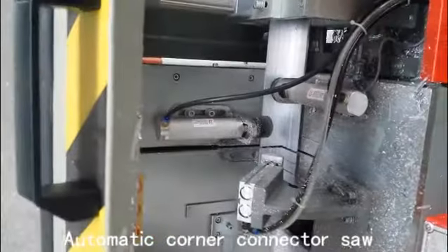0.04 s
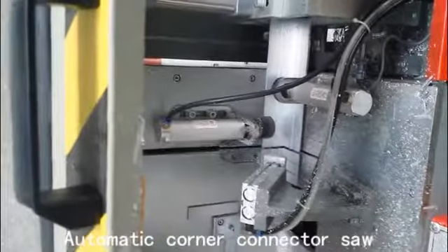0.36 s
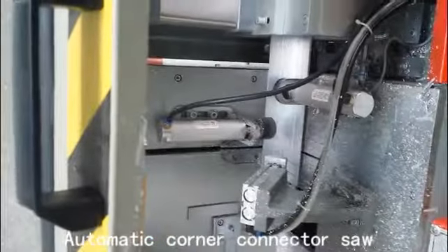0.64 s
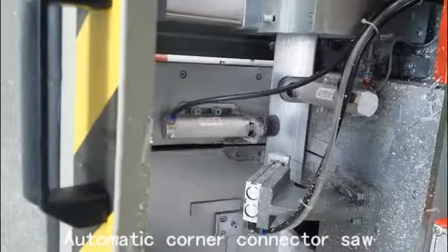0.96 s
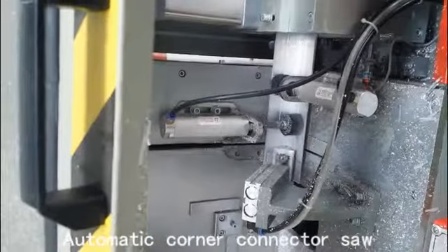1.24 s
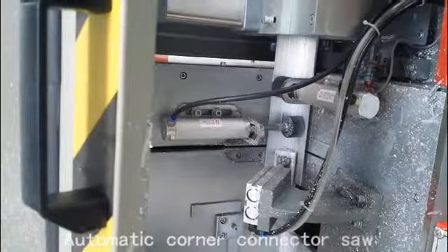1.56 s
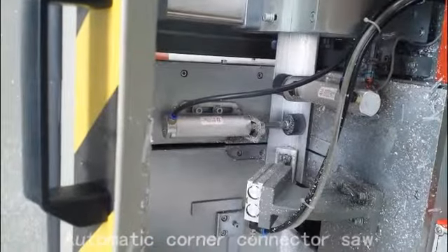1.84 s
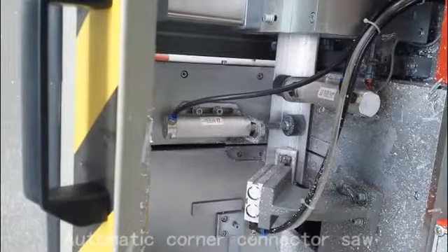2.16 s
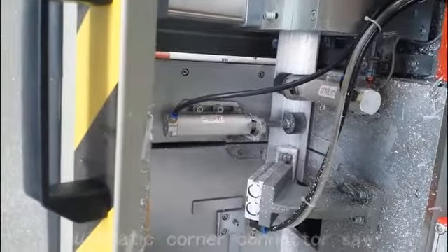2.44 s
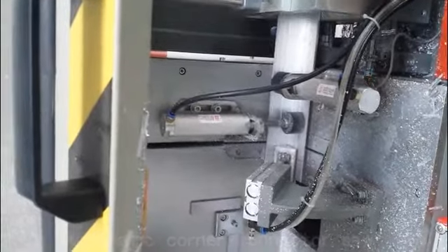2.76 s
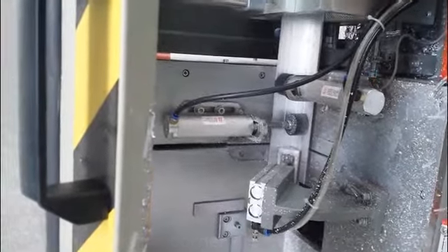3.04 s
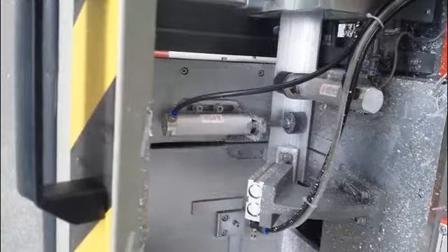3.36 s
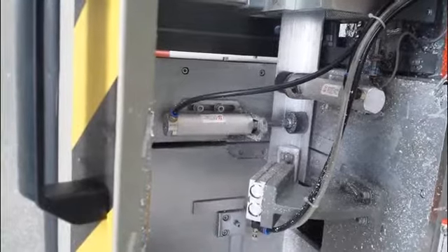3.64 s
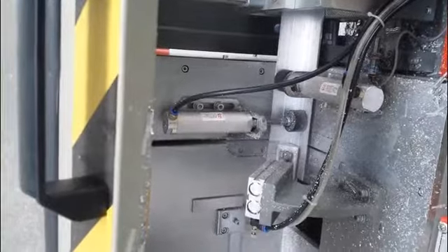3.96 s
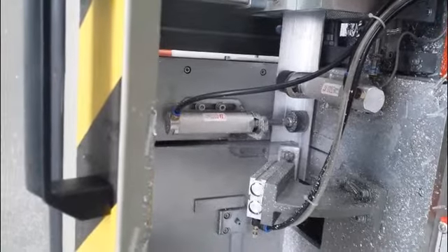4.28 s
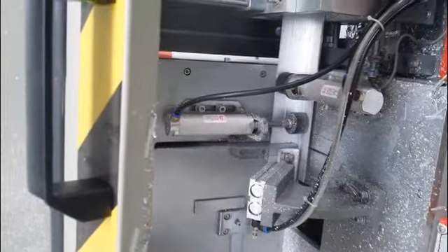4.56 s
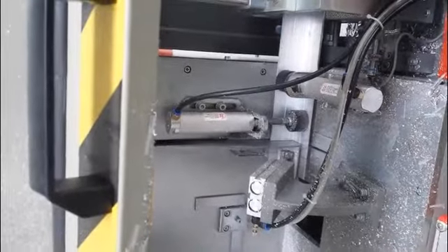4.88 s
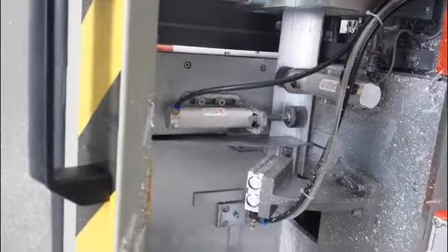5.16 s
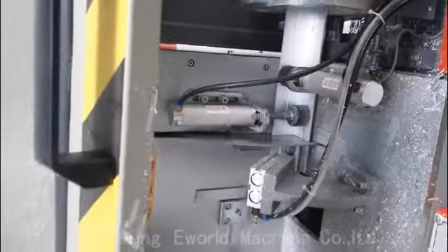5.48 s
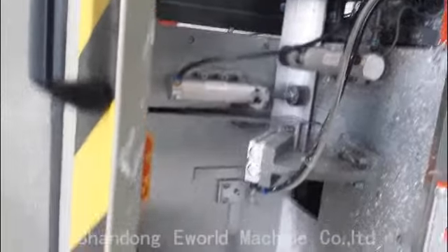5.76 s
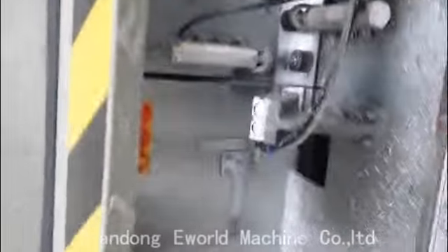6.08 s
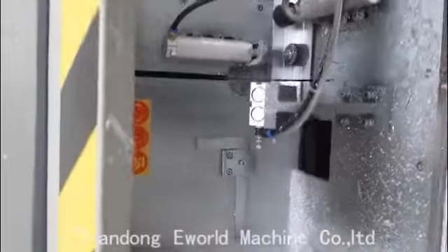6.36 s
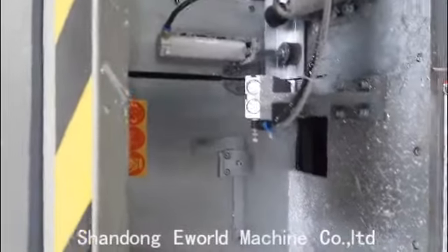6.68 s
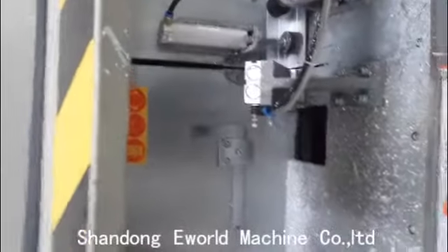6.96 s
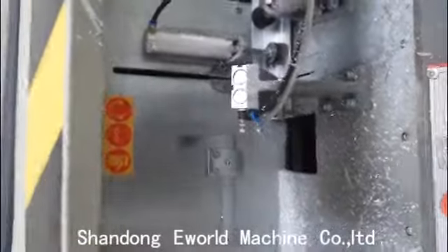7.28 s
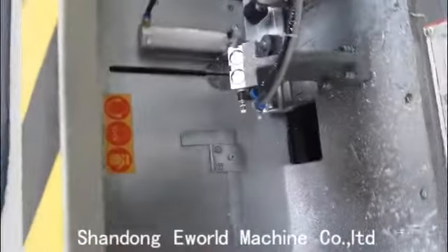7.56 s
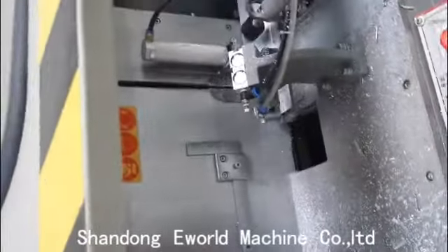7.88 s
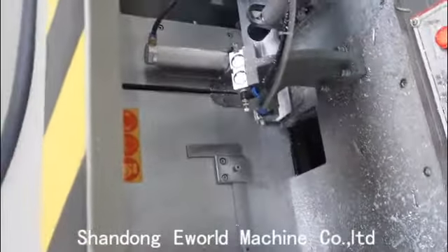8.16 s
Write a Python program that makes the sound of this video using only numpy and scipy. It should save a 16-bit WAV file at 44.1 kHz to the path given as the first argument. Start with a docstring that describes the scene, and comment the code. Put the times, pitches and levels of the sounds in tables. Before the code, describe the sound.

A saw's motor hums and drones close by throughout, with airy rushing from the spinning blade. A knock and a puff of air open, followed by a clack at 0.6 seconds. Around 0.9 a metal profile slides with a short groan, and at 1.1 air clamps shut with a loud double bang, echoing briefly in the workshop. Air puffs at 1.6, and from 2.1 a bright mist hiss swells. At 3.7 the blade bites into aluminium: a loud, very high whine with squeals, rasping chatter and spraying chips, sagging slightly in pitch. The cut ends near 5.3 and the pitch climbs back as air vents until 6.5. The retracting blade rings on, squealing strongly at 6 and grazing the metal at 6.4. Clamps release with a clatter at 6.9. A burst of air and two dull knocks come around 8, over the idling machine.

```python
"""Automatic saw cutting aluminium.

The profile slides forward, groaning as it sticks and slips, and air clamps bang shut. Coolant mist
hisses and the spinning blade comes out of its slot, stirring the air. Its teeth whine, chatter and tear
off chips as it slows in the metal; it rings on as it draws back, cylinders vent and the clamps let go.
The machine hums and drones underneath, and the blows echo in the workshop."""
import sys
import numpy as np
from scipy import signal
from scipy.io import wavfile
from scipy.ndimage import uniform_filter1d

SR = 44100
rng = np.random.default_rng(int(sys.argv[2]) if len(sys.argv) > 2 else 0)


def persist_wave(psi):
    """Save psi, clipped to +-1, as 16-bit WAV."""
    counts = np.round(np.clip(psi, -1, 1) * 32767).astype(np.int16)
    wavfile.write(sys.argv[1], SR, np.atleast_2d(counts).T)


N = 371322
ADVANCE_S, CUT_START_S, CUT_END_S, CLEAR_S = 1.96, 3.68, 5.26, 6.52  # blade stroke
TEETH = 108
TONE_DB, OCTAVE_DB, RUB_TONE_DB, RUB_OCTAVE_DB = -12, -15, -27, -33  # at full load; rubbing only


def whine(turns, tooth_hz, load):
    """Teeth strike harder with load; run-out throbs once a turn; fast glides beat with their echoes."""
    biting = np.clip(2 * load, 0, 1)
    rubbing = gate(CUT_START_S - .08, CLEAR_S, attack_s=.07, fall_db_per_s=150) * from_db(2.9 * drift(6))
    glide_hz_per_s = np.gradient(uniform_filter1d(tooth_hz, SR // 20)) * SR
    echo_share = .07 + .12 * biting + .5 * np.clip(np.abs(glide_hz_per_s) / 1300, 0, 1)
    shaft_rad = 2 * np.pi * turns
    phase = TEETH * shaft_rad + .09 * biting * drift(90)
    throb = 1 + biting * (.15 * np.sin(shaft_rad) + .08 * np.sin(2 * shaft_rad) + .1 * drift(60))
    tone_gain = np.hypot(from_db(TONE_DB) * load, from_db(RUB_TONE_DB) * rubbing) * pan(-.5)
    octave_gain = np.hypot(from_db(OCTAVE_DB) * np.sqrt(load), from_db(RUB_OCTAVE_DB) * rubbing) * pan(-16)
    tone = with_squeals(tone_gain, 1) * tooth_tone(phase, echo_share, flutter=.071)
    octave = with_squeals(octave_gain, 2) * tooth_tone(2 * phase, echo_share + .24, flutter=.11)
    third = biting * from_db(-30) * tooth_tone(3 * phase, echo_share + .2, flutter=.1)
    return throb * (tone + octave + third)


def tooth_tone(phase, echo_share, flutter):
    """One blade harmonic, out of step at the two ears; cabinet reflections beat against it."""
    sides = [np.exp(1j * (offset_rad + .45 * drift(1.5))) + echo_share * (drift(22) + 1j * drift(22))
             for offset_rad in (-.65, .65)]
    tone = np.real(np.array(sides) * (1 + flutter * drift(150)) * np.exp(1j * phase))
    return tone / np.sqrt(1 + 2 * echo_share ** 2)


# Blade squeals: middle t/s, half-power length/s, harmonic, peak level/dB, left-right/dB
SQUEALS = [(3.747, 0.041, 1, -8.5, 15), (3.835, .05, 1, -9, -8), (3.905, 0.082, 1, -8.5, 2),
           (4.027, 0.085, 1, -12, 8), (4.44, 0.22, 1, -17, -20), (4.71, 0.17, 1, -15, -17),
           (5.039, 0.093, 1, -9, 1.5), (5.351, 0.09, 1, -23, -14), (5.989, 0.13, 1, -6.5, 11),
           (6.231, 0.08, 1, -14, 5), (6.404, 0.11, 1, -15.5, -2), (3.74, 0.052, 2, -14, -17),
           (3.964, 0.035, 2, -3.5, -17), (4.637, .12, 2, -9, -12), (5.025, 0.1, 2, -11, -16)]


def with_squeals(steady_gain, order):
    """Stereo gain of one harmonic: the blade rings up and dies away in bell-shaped swells."""
    power = steady_gain ** 2
    for middle_s, length_s, harmonic, db, lean_db in SQUEALS:
        if harmonic == order:
            swell = .5 ** np.minimum((2 * (seconds() - middle_s) / length_s) ** 2, 60)
            power = power + (from_db(db) * pan(lean_db)) ** 2 * swell
    return np.sqrt(power)


# Tooth-passing rate in the cut: t/s, f/Hz
TOOTH_RATE = [(3.68, 5053), (3.774, 5020), (3.928, 4820), (3.996, 4690), (4.098, 4640), (4.486, 4813),
              (4.628, 4788), (4.878, 4865), (4.972, 4842), (5.1, 4880)]
IDLE_HZ, RUN_UP_S = 5054, .23
FULL_SAG_HZ, INERTIA_S = 503, .11


def blade_speed():
    """Tooth rate in Hz: dragged down in the cut, then running back up to idle."""
    cutting_hz = in_time(TOOTH_RATE)
    return IDLE_HZ + (cutting_hz - IDLE_HZ) * settling(TOOTH_RATE[-1][0], RUN_UP_S)


def blade_load(tooth_hz):
    """Cutting force, 1 at full load: it holds the speed down and brakes the blade's inertia."""
    sag_hz = uniform_filter1d(tooth_hz[0] - tooth_hz, SR // 12)
    braking_hz = INERTIA_S * np.gradient(sag_hz) * SR
    cutting = gate(CUT_START_S, CUT_END_S, attack_s=.02, fall_db_per_s=157)
    return np.maximum(sag_hz + braking_hz, 0) / FULL_SAG_HZ * cutting


# Teeth catching an edge: start/s, end/s, shaft order, level/dB, spread/orders
RASPS = [(3.676, 3.924, 28, -31.5, .8), (3.684, 3.818, 82, -18.5, 2.8), (3.824, 3.935, 81, -18, 3),
         (3.866, 4.063, 88, -21, 12), (3.905, 4.003, 54, -18, .9), (5.8, 6.55, 162, -31, .5)]
# Passes through the profile's two walls: start/s, end/s, level/dB
WALLS = [(4.003, 4.469, -5), (4.661, 5.161, -2.5)]
# Chatter in each wall: shaft order, relative level/dB, spread/orders
WALL_CHATTER = [(17, -36.5, .8), (54, -21, .4), (133.6, -19, 2.2), (243, -33, 4)]


def chatter(turns):
    """Uneven teeth repeat every turn, so chatter is a cluster of wavering shaft orders."""
    out = np.zeros((2, N))
    in_walls = [(start_s, end_s, centre, wall_db + db, width)
                for start_s, end_s, wall_db in WALLS for centre, db, width in WALL_CHATTER]
    for start_s, end_s, centre, db, width in RASPS + in_walls:
        span = slice(int(start_s * SR), int(end_s * SR))
        reach = np.ceil(2 * width)
        offsets = np.arange(-reach, reach + 1)[:, None]
        weights = np.exp(-(offsets / width) ** 2 / 2)
        lines = weights * np.exp(2j * np.pi * (round(centre) + offsets) * turns[span])
        swell = np.sin(np.linspace(0, np.pi, lines.shape[1], endpoint=False))
        for side in range(2):
            wander_rad = np.cumsum(rng.standard_normal(lines.shape), axis=1) * np.sqrt(25 / SR)
            wander_rad += 2 * np.pi * rng.random(offsets.shape)
            cluster = rms_one(np.real(lines * np.exp(1j * wander_rad)).sum(axis=0))
            out[side, span] += from_db(db) * cluster * swell
    return out


# Chip spectrum: f/Hz, relative level/dB
CHIP_SPECTRUM = [(700, -18), (1500, -2), (3000, 0.5), (6000, 5), (8500, 0.5), (11000, -6), (14500, -39)]
CHIPS_DB, GRAZE_DB, GRAZE_START_S, GRAZE_END_S = -15.5, -21, 6.31, 6.46


def chips(turns, load):
    """Chips tear off with load, in spurts once a turn and at random; the returning blade grazes the cut."""
    graze = gate(GRAZE_START_S, GRAZE_END_S, attack_s=.084, fall_db_per_s=300)
    strength = from_db(CHIPS_DB) * load + from_db(GRAZE_DB) * graze
    spurts_db = .41 * np.sin(2 * np.pi * turns) + drift(25)
    return strength * from_db(spurts_db) * noise(CHIP_SPECTRUM, flicker_db=3.5)


# Clamp, stop and cylinder blows: t/s, contact level/dB, low f/Hz, high f/Hz, t60/s, thud level/dB
BLOWS = [(.047, -13, 332, 1140, 0.096, -8), (.623, -18.5, 597, 3970, 0.28, -27),
         (.652, -23, 70, 170, 0.59, -40), (1.031, -18.5, 300, 4000, 0.67, -44),
         (1.048, -17, 2510, 10800, 0.46, -40), (1.125, -4, 1300, 9300, 0.22, -19),
         (1.147, -5.5, 1100, 5600, 0.11, -27), (1.279, -20.5, 7700, 9500, 0.058, -45),
         (1.306, -21.5, 250, 900, 0.12, -16.5), (2.0, -29.5, 300, 1210, 0.2, -37),
         (6.894, -14.5, 900, 3497, .059, -35), (6.902, -12.5, 603, 2600, 0.22, -33),
         (6.95, -22, 300, 1500, 0.19, -27), (7.955, -18.5, 291.5, 540, 0.59, -36),
         (8.079, -26.5, 250, 546, .39, -20.5)]
# Machine frame modes: f/Hz, relative level/dB, t60/s
FRAME_MODES = [(583, -12, 0.29), (1142, -6, 0.19), (1466, -13.5, 0.41), (1600, -25, .35),
               (1714, 6.5, 0.093), (2038, 2, 0.15), (2410, -3, 0.3), (3207, 2, 0.11), (3180, -30, 0.36),
               (3510, -31, 0.36), (4500, -24, .15)]
THUD_BAND_HZ, THUD_T60_S = (153, 270), .11


def blows():
    """Blows shake dense panel modes and the frame; the contact sets the band, and the cabinet thuds."""
    out, t = np.zeros((2, N + SR)), seconds(SR)
    crack = 1 + .48 * np.exp(-t / .0055)
    for start_s, db, low_hz, high_hz, t60_s, thud_db in BLOWS:
        panels = rng.standard_normal((2, SR))
        frame = sum(from_db(mode_db - 60 * t / ring_s) * np.sin(2 * np.pi * (hz * t + rng.random((2, 1))))
                    for hz, mode_db, ring_s in FRAME_MODES)
        hit = band(panels * crack * decay(t60_s) + .12 * frame, low_hz, high_hz)
        hit /= np.std(band(panels, low_hz, high_hz))
        thud = band(panels * decay(THUD_T60_S), *THUD_BAND_HZ) / np.std(band(panels, *THUD_BAND_HZ))
        start = round(start_s * SR)
        out[:, start:start + SR] += from_db(db) * spread(hit, np.sqrt(low_hz * high_hz))
        out[:, start:start + SR] += from_db(thud_db) * spread(thud, THUD_BAND_HZ[0])
    return out[:, :N]


def guard_ring(x):
    """The sheet-metal guard rings on after a blow, in a narrow band of dense modes."""
    return noise_tail(x, decay(t60_s=.17), low_hz=2720, high_hz=3240)


# Resonances of the hollow profile: f/Hz, width/Hz, relative level/dB
PROFILE_MODES = [(366, 230, 0), (606, 26, 0), (900, 26, 4.5), (1010, 20, -17), (1430, 25, -19),
                 (1586, 12, 3), (1710, 12, 0), (1870, 19, -6)]
FEED_START_S, FEED_STOP_S, SETTLE_S = .88, 1.097, .083
BREAKAWAY_DB, SLIDING_DB, SLIPS_PER_S = -9, -23.5, 2500


def slide():
    """The profile breaks loose, then sticks and slips over the table, groaning in its own resonances."""
    level_db = SLIDING_DB + (BREAKAWAY_DB - SLIDING_DB) * settling(FEED_START_S + .022, SETTLE_S)
    moving = gate(FEED_START_S, FEED_STOP_S, attack_s=.036, fall_db_per_s=700)
    slips = (rng.random(N) < SLIPS_PER_S / SR) * rng.standard_normal((2, N))
    groan = rms_one(sum(from_db(db) * stereo_band(slips, hz, width) for hz, width, db in PROFILE_MODES))
    scrape = rms_one(band(slips, low_hz=250, high_hz=1300))
    return moving * from_db(level_db) * rms_one(groan + .46 * scrape)


# Cylinder vents: start/s, end/s, level/dB, fall/(dB/s)
VENTS = [(.14, 0.297, -24, 37), (1.61, 1.665, -24.5, 28), (5.145, 6.483, -23.5, 114),
         (6.844, 6.889, -26.5, 38), (7.825, 7.869, -19, 41)]
# Exhaust spectrum: f/Hz, relative level/dB
EXHAUST_SPECTRUM = [(600, -31), (1500, -6), (3500, -1), (7000, -0.5), (9500, -2.5), (12000, -6),
                    (14500, -22)]
HISS_ATTACK_S, LEAK_DB = .035, -41


def cylinder_air():
    """Cylinders vent while they move, over a small steady leak."""
    vent_power = sum((from_db(db) * gate(start_s, end_s, HISS_ATTACK_S, fall)) ** 2
                     for start_s, end_s, db, fall in VENTS)
    strength = np.sqrt(from_db(LEAK_DB) ** 2 + vent_power)
    return strength * noise(EXHAUST_SPECTRUM, flicker_db=2) * pan(1)


# Swells of the mist hiss: start/s, end/s, full level/dB
MIST_SWELLS = [(2.105, 3.68, -17.5), (4.23, 5.096, -18)]
# Mist spectrum: f/Hz, relative level/dB
MIST_SPECTRUM = [(600, -40), (1500, -15), (3500, -5), (6000, -1), (8500, 3), (11000, -2.5), (14500, -7)]
SWELL_FROM_DB, SWELL_TAU_S = -6.5, .32


def coolant_mist():
    """Bright mist hiss that swells, sinks under the heaviest cutting and swells back."""
    strength = 0
    for start_s, end_s, db in MIST_SWELLS:
        audible = gate(start_s, end_s, HISS_ATTACK_S, fall_db_per_s=55)
        strength += audible * from_db(db + SWELL_FROM_DB * settling(start_s, SWELL_TAU_S))
    return strength * noise(MIST_SPECTRUM, flicker_db=1) * pan(1.5)


# Air stirred by the blade: t/s, level/dB
WINDAGE_LEVEL = [(0, -24), (1.0, -22.5), (1.3, -26), (1.9, -30), (2.45, -23.5), (2.95, -20.5),
                 (3.66, -20.5), (3.72, -28), (4.0, -36), (4.5, -33), (4.9, -31.5), (5.35, -22.5),
                 (5.75, -23.5), (5.92, -27.5), (6.9, -28), (7.7, -27.5), (8.0, -22.5), (8.42, -20.5)]
# Windage spectrum: f/Hz, relative level/dB
WINDAGE_SPECTRUM = [(90, -39), (130, -8), (250, -9), (450, -11), (800, -10), (1300, -14.5), (1900, -9.5),
                    (2500, -5), (3400, -8.5), (5000, -11), (7500, -10.5), (10000, -17.5), (14000, -32.5)]
# Tooth gullets resonating in the guard: f/Hz, nominal width/Hz, relative level/dB
GULLETS = [(2265, 350, -2.5), (2495, 195, 1), (2684, 160, -10.5)]


def windage(level_db):
    """The spinning teeth stir the air, which sings hollowly in the guard."""
    hollow = 0
    for hz, width_hz, db in GULLETS:
        broad = resonate(rng.standard_normal((2, N)), hz, 2 * width_hz)
        hollow += from_db(db) * rms_one(resonate(broad, hz, 2 * width_hz))
    rush = from_db(2) * noise(WINDAGE_SPECTRUM, flicker_db=1.96)
    return from_db(level_db) * (rush + hollow * pan(7))


# Turbulence spectrum: f/Hz, relative level/dB
BUFFET_SPECTRUM = [(65, -7), (110, 2), (180, 4.5), (280, -1.5), (500, -5.5), (1000, -13), (2000, -44),
                   (5000, -60)]
BUFFET_SHARE_DB, APPROACH_DB, IN_CUT_DB = -15, -24, -38


def buffet(windage_db):
    """Low turbulence of the blade's draught swells as the gap to the profile closes; drops at contact."""
    draught = from_db(windage_db + BUFFET_SHARE_DB)
    approach = from_db(APPROACH_DB) * gate(ADVANCE_S, CUT_START_S, attack_s=.94, fall_db_per_s=300)
    in_cut = from_db(IN_CUT_DB) * gate(CUT_START_S, CUT_END_S, attack_s=.21, fall_db_per_s=7)
    return np.sqrt(draught ** 2 + approach ** 2 + in_cut ** 2) * noise(BUFFET_SPECTRUM, flicker_db=1)


# Motor hum: shaft order, level/dB
HUM_ORDERS = [(3, -42), (8, -49.5), (17, -55.5)]
# Hum envelope: t/s, gain/dB
HUM_GAIN = [(0, 6), (.8, 7), (1.6, -15), (2.3, 3), (3.6, 2), (3.9, -10), (4.9, -17), (5.3, 8.5), (6.0, -7),
            (6.8, -1.5), (7.2, 6), (8.42, 5)]


def motor(turns):
    """The motor hums at low orders of the shaft, wavering a little."""
    hum = sum(from_db(db + 2 * drift(2.8)) * np.sin(2 * np.pi * order * turns + .079 * drift(3.2))
              for order, db in HUM_ORDERS)
    return np.sqrt(2) * hum * from_db(in_time(HUM_GAIN)) * pan(2)


# Low machine drone, strongest as a hum near four times shaft speed: f/Hz, width/Hz, level/dB
DRONE_BANDS = [(100, 23, -50.5), (183.4, 16, -42), (440, 90, -47.5)]
# Hall rumble spectrum: f/Hz, relative level/dB
HALL_SPECTRUM = [(25, -5), (45, -2), (90, 10), (150, -1)]


def drone(turns, windage_db):
    """The machine drones in narrow noise bands over the shaft's unbalance and the hall's rumble."""
    bands = sum(from_db(db) * stereo_band(rng.standard_normal((2, N)), hz, width_hz)
                for hz, width_hz, db in DRONE_BANDS)
    unbalance = .5 * np.sin(2 * np.pi * turns)
    rumble_db = -43 + .74 * (windage_db + 24.5)  # follows part of the windage's swing
    return bands + from_db(rumble_db) * (unbalance + .64 * noise(HALL_SPECTRUM, flicker_db=1.5))


def bass_dip(x, edge_hz=92):
    """The deep bass drops away during the cut and creeps back afterwards."""
    share = gate(CUT_START_S, CUT_END_S, attack_s=.091, fall_db_per_s=29)
    thin = signal.sosfilt(signal.butter(4, edge_hz, "high", fs=SR, output="sos"), x)
    return (1 - share) * x + share * thin


def cabinet_echoes(x, count=6, echo_db=-15, delay_range_s=(.0015, .012)):
    """Close reflections, different at each ear, comb the hiss without changing its level."""
    out = x.copy()
    lags = (SR * rng.uniform(*delay_range_s, (2, count))).astype(int)
    for side in range(2):
        for k, lag in enumerate(lags[side]):
            out[side, lag:] += (-1) ** k * from_db(echo_db) * x[side, :-lag]
    return out / np.sqrt(1 + count * from_db(echo_db) ** 2)


def workshop(x):
    """The hall returns a diffuse, dull tail after 12 ms."""
    return noise_tail(x, decay(t60_s=.99) * (seconds(SR) > .012), low_hz=152, high_hz=5070)


# Stereo likeness: f/Hz, left-right correlation (capped at 1)
LIKENESS = [(40, 0.1), (120, 1.06), (300, 0.76), (600, 0.66), (1200, 0.1), (3000, 0.06), (10000, 0)]
# Stereo balance: f/Hz, left-right/dB
LEAN = [(100, 2.5), (1000, 2), (2500, 2), (5000, 2.5), (10000, -8.5)]


def spread(pair, hz):
    """Two unrelated signals become left and right: alike in the upper bass, unrelated in the treble."""
    alike = np.clip(at_hz(LIKENESS, hz), -1, 1)
    mid = np.sqrt((1 + alike) / 2) * pair[0]
    side = np.sqrt((1 - alike) / 2) * pair[1]
    return np.array([mid + side, mid - side]) * pan(at_hz(LEAN, hz))


def stereo_band(pair, hz, width_hz):
    """One narrow band in stereo; rms 1."""
    return rms_one(spread(band(pair, hz - width_hz / 2, hz + width_hz / 2), hz))


def noise(spectrum, flicker_db):
    """Bands of stereo noise, each flickering on its own; rms 1."""
    edges_hz = np.r_[np.geomspace(25, 4500, 15), np.linspace(6000, 15000, 6)]
    white = rng.standard_normal((2, 2, N))
    out = 0
    for k, (low_hz, high_hz) in enumerate(zip(edges_hz, edges_hz[1:])):
        hz = np.sqrt(low_hz * high_hz)
        if spectrum[0][0] / np.sqrt(2) < hz < spectrum[-1][0] * 2:
            gain = from_db(at_hz(spectrum, hz) + flicker_db * drift(7))
            out += gain * spread(band(white[k % 2], low_hz, high_hz), hz)
    return rms_one(out)


def noise_tail(x, envelope, low_hz, high_hz):
    """Convolves with one second of shaped band noise of unit energy."""
    tail = band(rng.standard_normal((2, SR)), low_hz, high_hz) * envelope
    return signal.fftconvolve(x, tail / np.sqrt(np.sum(tail ** 2) / 2), axes=1)[:, :N]


def drift(rate_hz):
    """Smooth random curve of spread 1."""
    hop, warm_up = 40, 2000
    pole = np.exp(-2 * np.pi * rate_hz * hop / SR)
    white = rng.standard_normal(N // hop + warm_up + 2)
    slow = signal.lfilter([1], [1, -2 * pole, pole ** 2], white)[warm_up:]
    return np.interp(np.arange(N) / hop, np.arange(len(slow)), rms_one(slow))


def band(x, low_hz, high_hz):
    edges_hz = np.clip([low_hz, max(high_hz, 1.1 * low_hz)], 10, .47 * SR)
    return signal.sosfilt(signal.butter(2, edges_hz, "band", fs=SR, output="sos"), x)


def resonate(x, hz, width_hz):
    """One resonance with peak gain 1."""
    r = np.exp(-np.pi * width_hz / SR)
    feedback = [1, -2 * r * np.cos(2 * np.pi * hz / SR), r * r]
    return signal.lfilter(np.array([1, 0, -1]) * (1 - r * r) / 2, feedback, x)


def gate(start_s, end_s, attack_s, fall_db_per_s):
    """Rises from the start, holds at 1, dies away after the end."""
    t = seconds()
    fall_db = np.minimum(fall_db_per_s * np.maximum(t - end_s, 0), 200)
    return np.clip((t - start_s) / attack_s, 0, 1) * from_db(-fall_db)


def settling(start_s, tau_s):
    """1 up to the start, then relaxing towards 0."""
    return np.exp(-np.maximum(seconds() - start_s, 0) / tau_s)


def decay(t60_s):
    return from_db(-60 * seconds(SR) / t60_s)


def pan(lean_db):
    """Constant-power gains; positive leans left."""
    gains = from_db(lean_db * np.array([[.5], [-.5]]))
    return gains / np.sqrt(np.mean(gains ** 2))


def in_time(table):
    return np.interp(seconds(), *np.transpose(table))


def at_hz(table, hz):
    points_hz, values = np.transpose(table)
    return np.interp(np.log(hz), np.log(points_hz), values)


def seconds(samples=N):
    return np.arange(samples) / SR


def from_db(db):
    return 10 ** (np.asarray(db) / 20)


def rms_one(x):
    return x / np.sqrt(np.mean(x ** 2) + 1e-20)


# The whole sound ducks briefly just before the clamp bang: t/s, gain/dB
PRE_BANG_DIP = [(1.092, 0), (1.113, -10), (1.1235, -10), (1.1255, 0)]


def scene():
    """Blade speed sets the load, which drives whine and chips; feed, clamps and air surround the cut."""
    tooth_hz = blade_speed()
    turns = np.cumsum(tooth_hz) / SR / TEETH
    load = blade_load(tooth_hz)
    windage_db = in_time(WINDAGE_LEVEL)
    knocks = blows()
    handling = knocks + from_db(-13.5) * guard_ring(knocks) + slide()
    idling = bass_dip(windage(windage_db) + buffet(windage_db) + motor(turns) + drone(turns, windage_db))
    singing = whine(turns, tooth_hz, load) + chatter(turns)
    hiss = cabinet_echoes(chips(turns, load) + cylinder_air() + coolant_mist())
    reverb = from_db(-11.5) * workshop(handling)
    return from_db(in_time(PRE_BANG_DIP)) * (singing + handling + hiss + idling + reverb)


CEILING, CUTOFF_HZ = .95, 14650


def record(dry):
    """The loudest peaks overload softly; the top treble is cut."""
    held = dry / (1 + np.abs(dry / CEILING) ** 6) ** (1 / 6)
    return signal.sosfilt(signal.ellip(12, .1, 80, CUTOFF_HZ, fs=SR, output="sos"), held)


dry = scene()
out = record(dry)
persist_wave(out)
```